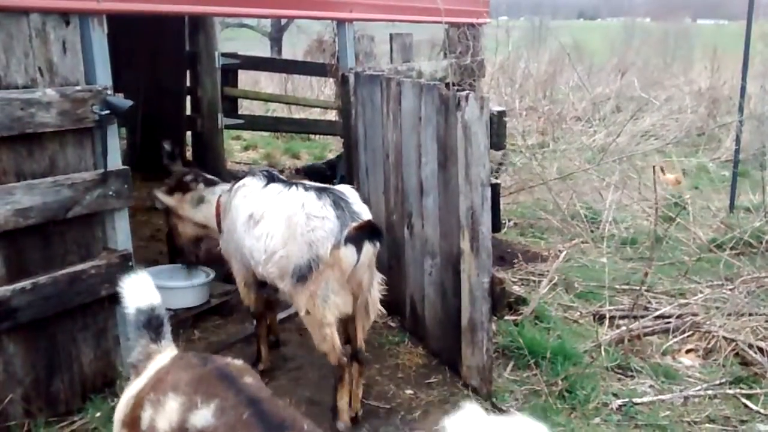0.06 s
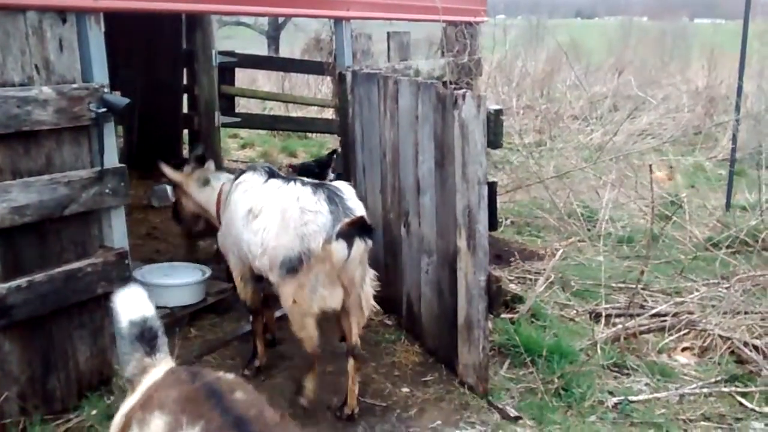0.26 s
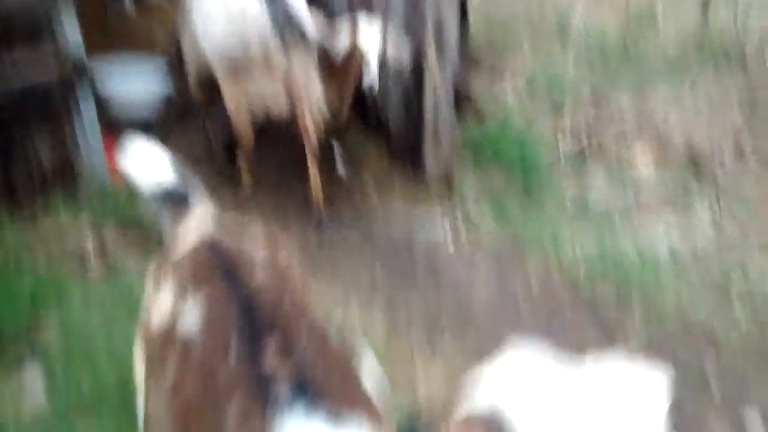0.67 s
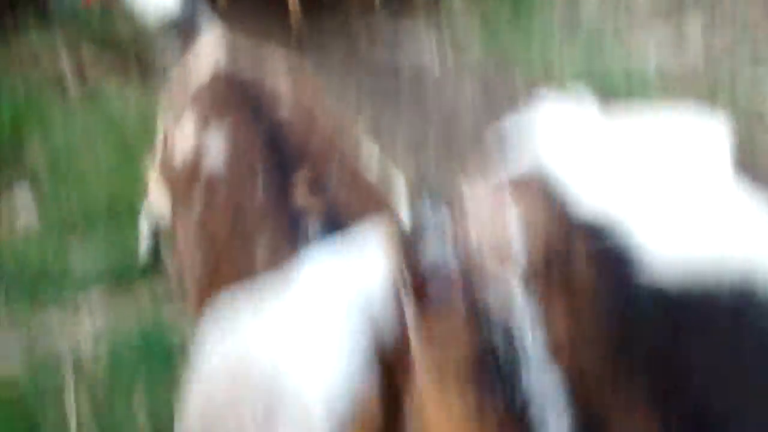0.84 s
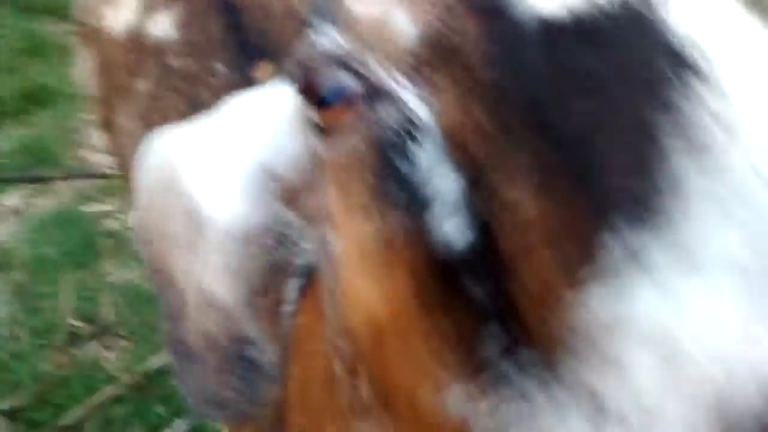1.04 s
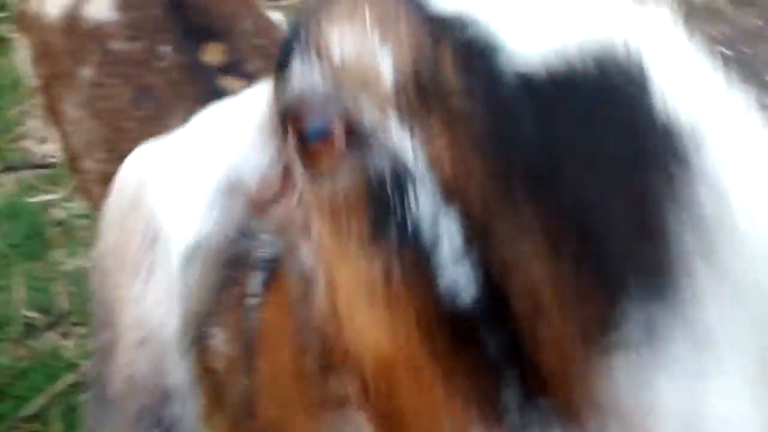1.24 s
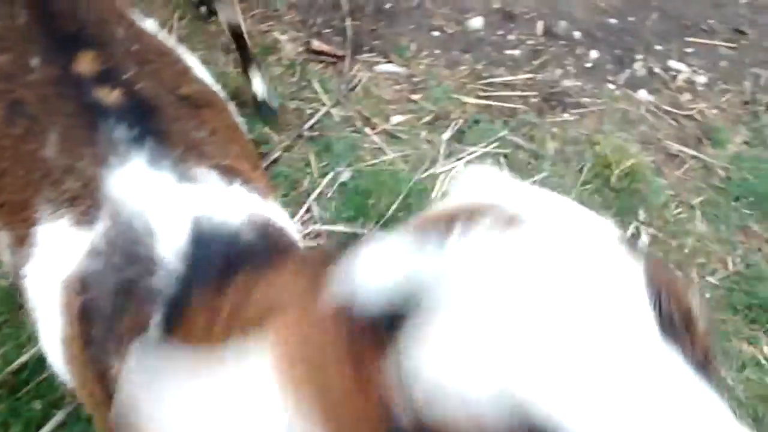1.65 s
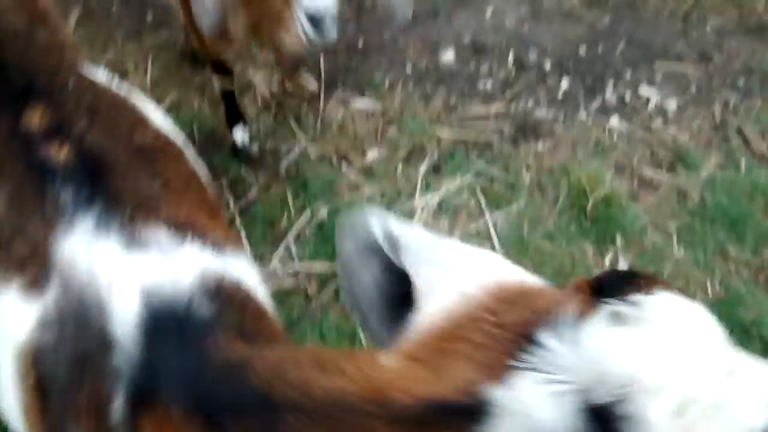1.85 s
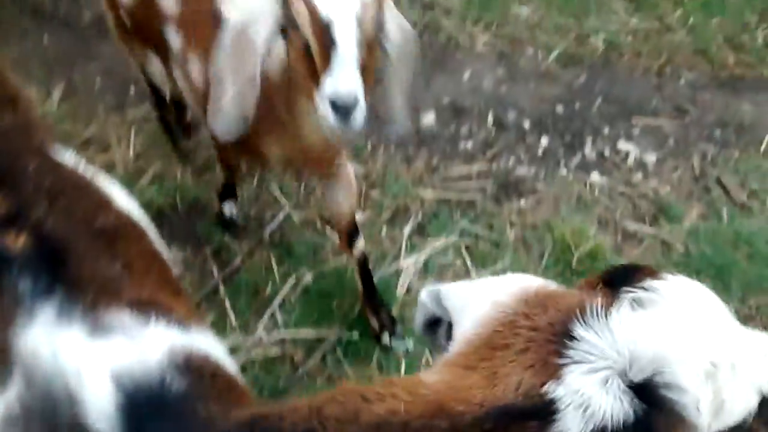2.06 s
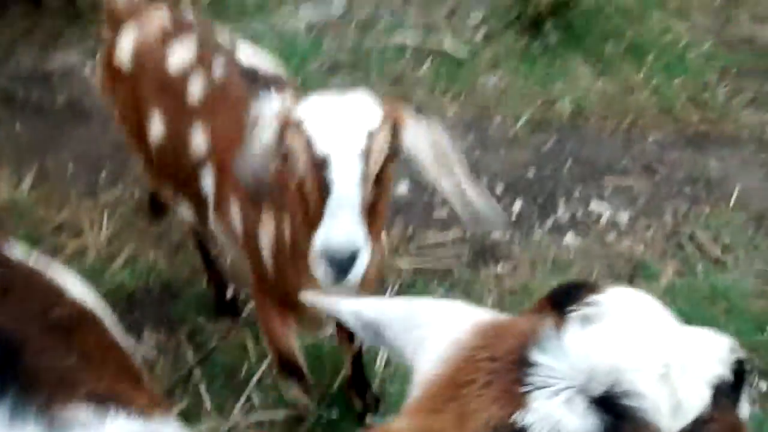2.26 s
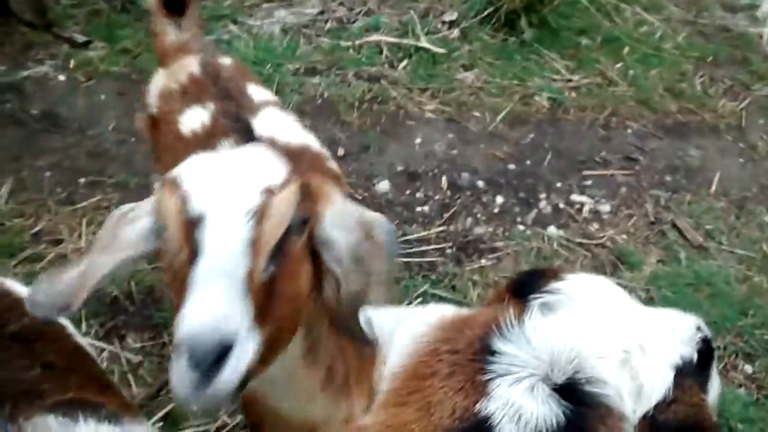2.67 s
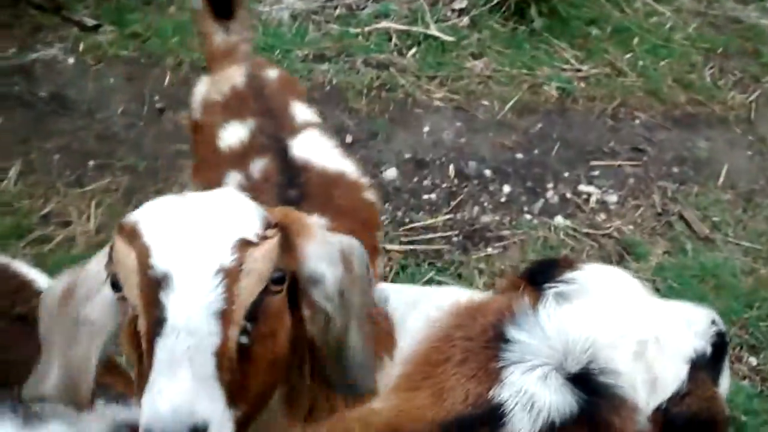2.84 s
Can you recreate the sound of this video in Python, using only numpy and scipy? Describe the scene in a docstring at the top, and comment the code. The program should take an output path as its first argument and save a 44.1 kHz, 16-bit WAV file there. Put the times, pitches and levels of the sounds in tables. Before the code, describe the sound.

Goats step around near the microphone outdoors: stalks snap, hooves thud and click on small stones, and later lighter steps rustle through straw. Soft herd shuffling, low gusts on the microphone and a faint grass hiss run underneath.

```python
"""Hooves thud and tap on dry earth as goats step about close by: they snap stalks, clack on small
stones and scuff through the straw, and one goat walks up through the litter. The herd shuffles all around.
A light wind makes a low, gusty rumble on the microphone of a hand-held camera, opposite in phase
left and right, and hisses in the grass."""
import sys
import numpy as np
from scipy import signal
from scipy.fft import rfft, irfft, next_fast_len
from scipy.io import wavfile
from scipy.ndimage import map_coordinates

SR = 44100
rng = np.random.default_rng(int(sys.argv[2]) if len(sys.argv) > 2 else 0)


def put_to_file(sound):
    """Save the sound as 16-bit audio at rate SR, in the file named by the first command-line argument."""
    columns = np.atleast_2d(sound).T  # one column per channel
    safe = np.clip(columns, -1, 1)
    whole_steps = np.round(safe * 32767)
    wavfile.write(sys.argv[1], SR, whole_steps.astype(np.int16))


N = 132300
BITE_HZ = 3750  # tilt knee, straw and stalks


def amp(db):
    return 10 ** (np.asarray(db) / 20)


def unit(x):
    return x / np.sqrt(np.mean(x ** 2) + 1e-20)


def clock():
    return np.arange(N) / SR


def along(points, hz):
    """Interpolate (f/Hz, value) rows on a log axis."""
    f, v = np.transpose(points)
    return np.interp(np.log(hz + 1), np.log(f + 1), v)


def curve(rows):
    """Interpolate (t/s, value) rows per sample."""
    return np.interp(clock(), *np.transpose(rows))


def wobble(knots_per_s):
    """Smooth random curve."""
    return map_coordinates(rng.standard_normal(1024), [clock() * knots_per_s], mode="mirror")


def filtered(x, response):
    """Apply a complex frequency response."""
    size = next_fast_len(N + SR // 2)
    return irfft(rfft(x, size) * response(np.fft.rfftfreq(size, 1 / SR)), size)[..., :N]


def noise(tone):
    """Noise of rms 1, coloured by (f/Hz, level/dB) rows."""
    return unit(filtered(rng.standard_normal(N), lambda hz: amp(along(tone, hz))))


def tilted_db(tone, hz, db_per_oct, knee_hz):
    """Tone curve, tilted above the knee."""
    return along(tone, hz) + db_per_oct * np.log2(1 + (hz / knee_hz) ** 2) / 2


def impact(tone, db_per_oct=0, knee_hz=BITE_HZ, ripple_db=0, size=4096):
    """Coloured pulse of peak 1; ripple adds chance resonances."""
    hz = np.fft.rfftfreq(size, 1 / SR)
    ripple = map_coordinates(rng.standard_normal(128), [hz / 330], mode="mirror")
    colour = amp(tilted_db(tone, hz, db_per_oct, knee_hz) + ripple_db * ripple)
    cepstrum = irfft(np.log(colour))
    cepstrum[1:size // 2] *= 2  # fold to minimum phase
    cepstrum[size // 2 + 1:] = 0
    pulse = irfft(np.exp(rfft(cepstrum)))
    return pulse / np.abs(pulse).max()


def add(track, start_s, x):
    part = track[max(round(start_s * SR), 0):][:len(x)]
    part += x[:len(part)]


# hoof landings: t/s, peak/dB
THUDS = [(0.7562, -19.5), (0.916, -23), (1.002, -27.5), (1.025, -33.5), (1.115, -26), (2.229, -33),
         (2.336, -32), (2.45, -34), (2.991, -32)]
# light steps: t/s, peak/dB, tilt/(dB/oct)
TAPS = [(0.4313, -29.5, -2), (0.4373, -29.5, 1.5), (.551, -34, 6.5), (0.6948, -35, -1.5),
        (0.9095, -25.5, 5), (0.919, -28.5, -2), (0.944, -33, 1), (1.0156, -30, 4.5), (1.0219, -28, 3.5),
        (1.0734, -33, 2), (1.1161, -30, 9), (1.1689, -33.5, 1), (1.227, -30.5, -3.5), (1.282, -38, 3),
        (1.2899, -34, 4.5), (1.3525, -28.5, -1.5), (1.4481, -31, 0), (2.1527, -26, -5.5),
        (2.3721, -31.5, -1), (2.3928, -32.5, -7), (2.4488, -29.5, -1), (2.540, -31.5, -0.5),
        (2.604, -34.5, -2.5), (2.683, -30.5, -6), (2.7568, -32, -7), (2.7827, -30.5, -4.5),
        (2.990, -28.5, -5)]
# spectra: f/Hz, level/dB
THUD_TONE = [(20, -41.5), (60, 6.5), (105, 4), (180, -4), (300, -7), (600, -41.5), (1500, -50),
             (8000, -100)]
TAP_TONE = [(50, 2), (200, 7), (500, 3.5), (900, -8), (1500, -9.5), (2500, -12), (4000, -28), (9000, -47),
            (16000, -48)]
CRUMB_TONE = [(100, -40), (300, 3.5), (500, -7), (850, -3), (1500, -29), (4000, -24)]


def hooves(crumb_db=-22.5, crumb_decay_s=0.0068):
    """Dull thuds of weight on soil; lighter, dry taps crumble it a little."""
    out, crumble = np.zeros(N), np.zeros(N)
    t = np.arange(SR // 10) / SR
    for s, db in THUDS:
        add(out, s, amp(db) * impact(THUD_TONE))
    for s, db, tilt in TAPS:
        add(out, s, amp(db) * impact(TAP_TONE, tilt, knee_hz=278, ripple_db=3))
        add(crumble, s, amp(db + crumb_db) * np.exp(-t / crumb_decay_s))
    return out + crumble * noise(CRUMB_TONE)


# dry stalks breaking: t/s, peak/dB, tilt/(dB/oct)
SNAPS = [(0.2044, -18.5, -6), (0.21, -18.5, -11), (0.2135, -19.5, 0), (0.229, -32, 5), (0.2338, -27, -2),
         (0.2507, -19.5, 9.5), (0.2602, -29, 2), (.273, -28, -1), (0.432, -23, 1), (.436, -22, -7),
         (0.4419, -25, -12), (0.508, -22, -1), (1.2111, -31, 4.5), (2.143, -27, 3), (2.215, -28.5, 4),
         (2.321, -25.5, 6.5), (2.33, -29, 8), (2.3425, -29, 9.5)]
# stalk spectrum: f/Hz, level/dB
SNAP_TONE = [(200, -43), (1400, -19), (2400, -7), (3200, -1.5), (3950, 5.5), (5300, 3.5), (6600, -7),
             (8000, -15), (16000, -28.5)]


def snaps(tear_db=-26.5, tear_decay_s=0.0022):
    """Each stalk breaks with its own short ring; a few fibres tear after it."""
    out, t = np.zeros(N), np.arange(SR // 100) / SR
    for s, db, tilt in SNAPS:
        force = amp(tear_db) * np.exp(-t / tear_decay_s) * rng.standard_normal(len(t)) / 2
        force[0] = 1  # the break
        add(out, s, amp(db) * np.convolve(force, impact(SNAP_TONE, tilt, ripple_db=3)))
    return out


# hoof on stone: t/s, level/dB, contact/s, ring gain/dB
CLACKS = [(.6276, -23, 0.0037, -0.5), (1.2889, -38.5, 0.0052, 0), (1.878, -30, 0.0036, -4),
          (2.5143, -32.5, 0.0024, 0.5)]
# ring modes: f/Hz, level/dB
STONE_MODES = [(1390, -7), (3880, -1), (4280, -6)]
# grit spectrum: f/Hz, level/dB
GRIT_TONE = [(100, -15), (800, -3.5), (1500, -7), (2100, -2.5), (4000, -3.5), (5700, 3.5), (6800, -6),
             (7600, -13.5), (16000, -39)]


def clacks(grate_decay_s=0.0012, ring_decay_s=0.0013, detune=0.017):
    """Brief grating contact cracks grit and builds up the ring of hoof and stone."""
    t, force, ring = np.arange(SR // 20) / SR, np.zeros(N), np.zeros(N)
    for s, db, contact_s, ring_db in CLACKS:
        after_s = np.maximum(t - contact_s, 0)
        add(force, s, amp(db) * np.exp(-after_s / grate_decay_s))
        envelope = np.minimum(t / contact_s, 1) * np.exp(-after_s / ring_decay_s)
        for hz, mode_db in STONE_MODES:
            cycles = hz * (1 + detune * rng.standard_normal()) * t + rng.random()
            add(ring, s, amp(db + ring_db + mode_db) * envelope * np.sin(2 * np.pi * cycles))
    return ring + amp(-6) * force * noise(GRIT_TONE)


# scuffs: centre t/s, level/dB, half width/s, tilt/(dB/oct)
SCUFFS = [(0.219, -42.5, 0.0068, -2), (0.257, -50, 0.028, -6), (0.438, -44, 0.01, -9),
          (0.535, -44, 0.012, -10.5), (0.637, -44, 0.0081, -14), (0.67, -44.5, 0.0035, -16),
          (0.719, -55.5, 0.07, -13), (0.958, -46, 0.016, -7.5), (1.215, -46, 0.0096, -0.5),
          (1.303, -48.5, 0.0084, -2), (1.418, -54, 0.011, 5), (1.914, -52.5, 0.032, -6),
          (2.149, -48, 0.022, -0.5), (2.18, -51, 0.019, 11.5), (2.235, -51.5, 0.0043, 6),
          (2.33, -51.5, 0.012, -1), (2.544, -55, 0.038, -6), (2.609, -51, 0.0046, 1),
          (2.734, -52, 0.024, -5.5)]
# straw spectrum: f/Hz, level/dB
STRAW_TONE = [(300, -8.5), (1400, -12), (2500, -11), (3200, -7), (3850, 3), (4500, -1), (5400, 0.5),
              (6600, -7), (7700, -2), (9000, -13.5), (15500, -21)]


def straw(grains_per_s=4000):
    """Tiny crackles swell under each scuff; a thin crackle goes on between."""
    t, out = clock(), np.zeros(N)
    grains = (rng.random(N) < grains_per_s / SR) * rng.standard_normal(N)
    grains *= amp(2 * np.minimum(rng.exponential(size=N), 4))
    for s, db, half_s, tilt in SCUFFS:
        near = slice(round(s * SR) - SR // 8, round(s * SR) + SR // 8)
        hz = np.fft.rfftfreq(len(t[near]), 1 / SR)
        colour = amp(tilted_db(STRAW_TONE, hz, tilt, BITE_HZ))
        crackle = unit(irfft(rfft(rng.permutation(grains[near])) * colour))
        out[near] += amp(db) * np.exp(-((t[near] - s) / half_s) ** 2 / 2) * crackle
    return out + amp(-63) * unit(filtered(grains, lambda hz: amp(along(STRAW_TONE, hz))))


def litter(from_s=2.05, to_s=2.85, count=22, straw_db=-46, earth_db=-42.5, spread_db=3):
    """Straws tick and crumbs of earth roll under the approaching goat."""
    out = np.zeros(N)
    for tone, db in (SNAP_TONE, straw_db), (TAP_TONE, earth_db):
        for s in rng.uniform(from_s, to_s, count):
            add(out, s, amp(db + spread_db * rng.standard_normal()) * impact(tone, ripple_db=4))
    return out


# herd movement: t/s, level/dB
SHUFFLE = [(0, -61), (.4, -57.5), (.6, -49), (.7, -53.5), (.82, -54.5), (1.15, -56.5), (1.42, -55),
           (1.72, -60.5), (1.8, -57), (1.855, -45.5), (1.92, -50), (2.02, -55.5), (2.3, -55.5), (2.62, -60),
           (3, -66)]
# its spectrum: f/Hz, level/dB
SHUFFLE_TONE = [(40, -0.5), (120, 4), (200, 2), (350, 1.5), (520, -4), (800, -7.5), (1400, -16.5),
                (2400, -17), (6000, -26.5)]


def shuffle():
    """Soft, uneven coat rubbing and trampling all around."""
    shared = amp(-4) * noise(SHUFFLE_TONE)
    level = amp(curve(SHUFFLE) + 1.8 * wobble(45.54))
    sides = np.array([amp(db) * noise(SHUFFLE_TONE) for db in (-6, -4.5)])
    return level * (shared + sides)


# buffeting: t/s, level/dB
BUFFET = [(0, -45.5), (.18, -45), (.25, -33), (.38, -29.5), (.5, -28.5), (.62, -41), (.82, -40.5),
          (1.14, -47), (1.22, -29), (1.33, -36.5), (1.5, -27), (1.62, -34.5), (1.9, -32), (2.3, -37.5),
          (2.72, -36.5), (2.92, -40.5)]
# single puffs: t/s, peak/dB, f/Hz
PUFFS = [(0.359, -17, 36.5), (0.388, -12.5, 57), (0.591, -19.5, 64.6), (1.385, -22.5, 58),
         (1.417, -12, 57.4), (1.559, -8.5, 53.7), (1.589, -18, 69), (1.736, -19.5, 48.6)]
# spectra: f/Hz, level/dB
WIND_TONE = [(8, 2.5), (20, 2.5), (50, -2.5), (90, -7.5), (150, -23), (300, -38), (700, -83), (3000, -106)]
FLUTTER_TONE = [(60, 6), (130, 10), (200, 8), (300, -30), (600, -30), (2000, -70)]


def wind():
    """Low, gusty rumble on the microphone, opposite in phase left and right; a few puffs stand out."""
    t, level = clock(), amp(curve(BUFFET))
    rumble = level * amp(1.3 * wobble(9)) * noise(WIND_TONE)
    flutter = amp(-17) * noise(FLUTTER_TONE)
    for s, db, hz in PUFFS:
        cycles = (t - s) * hz
        envelope = amp(db) / (1 + (cycles / 0.55) ** 2) ** 2
        rumble += envelope * (np.cos(2 * np.pi * cycles) + flutter)
    right = -amp(-2.5) * rumble + amp(-10.5) * level * noise(WIND_TONE)
    return np.array([rumble, right])


# hiss spectrum: f/Hz, level/dB
GRASS_TONE = [(50, 12.5), (300, 9.5), (800, 2), (1400, 0.5), (2000, 1.5), (2600, -6), (3200, 0),
              (3900, -3.5), (5000, -6.5), (6600, -4), (7600, -9), (8700, -6), (10500, -7), (15500, -7)]
# left-right likeness: f/Hz, correlation
GRASS_LIKENESS = [(100, -1.92), (600, -0.21), (1300, 1), (2400, -0.96), (3700, 0.37), (6000, 0.17),
                  (15000, -0.031)]


def grass(level_db=-55.5):
    """Steady, wide hiss of breeze in dry grass."""
    def mid_side_gains(hz):
        angle = np.arccos(np.clip(along(GRASS_LIKENESS, hz), -1, 1)) / 2
        return np.array([np.cos(angle), np.sin(angle)])

    mid, side = filtered(np.array([noise(GRASS_TONE), noise(GRASS_TONE)]), mid_side_gains)
    return amp(level_db + 0.57 * wobble(4.3)) * unit(np.array([mid + side, mid - side]))


# scatter decay: f/Hz, T60/s
YARD_T60 = [(200, 0.11), (1500, 0.04), (3900, 0.47), (5500, 0.32), (12000, 0.13)]


def yard(x):
    """Faint scatter from shed and ground."""
    hz, t, spectra = signal.stft(rng.standard_normal((2, SR // 2)), SR, nperseg=256)
    decay = amp(-60 * t / along(YARD_T60, hz)[:, None])
    tail = signal.istft(spectra * decay, SR, nperseg=256)[1]
    tail /= np.linalg.norm(tail[0])
    return signal.fftconvolve(x[None], tail, axes=1)[:, :N] * amp([[-2.5], [0]])


# left re right: f/Hz, level/dB
LEFT_DB = [(60, -2.5), (250, -7.5), (600, -5.5), (1300, -5), (2400, -4), (4400, -11.5), (8000, 2),
           (15000, 1.5)]
# left re right: f/Hz, phase lead/rad
LEFT_LEAD_RAD = [(350, -3.3), (850, -6.2), (1650, -6.1), (2100, -9.6), (2600, -9.8), (3100, -12.3),
                 (4250, -12.3), (4600, -14.8), (5400, -15.3), (7800, -22.3), (10200, -28.3), (16000, -42.5)]


def stereo(x):
    """Near sound: mostly louder on the right, opposite in phase in the bass."""
    left = filtered(x, lambda hz: amp(along(LEFT_DB, hz)) * np.exp(1j * along(LEFT_LEAD_RAD, hz)))
    return np.array([left, x])


def scene():
    crisp = snaps() + clacks() + straw() + litter()
    dull = hooves()
    goats = stereo(crisp + dull) + shuffle()
    scatter = yard(amp(-16) * crisp + amp(-15) * dull)
    return goats + scatter + wind() + grass()


def record(dry):
    """Camera band limit."""
    return filtered(dry, lambda hz: hz < 15600)


dry = scene()
out = record(dry)
put_to_file(out)
```